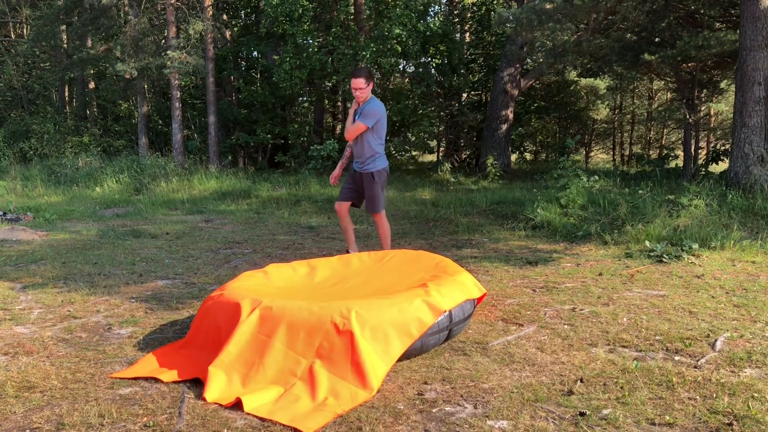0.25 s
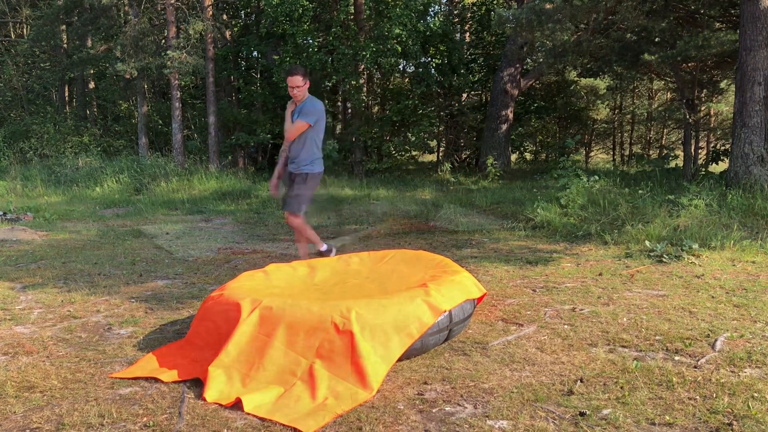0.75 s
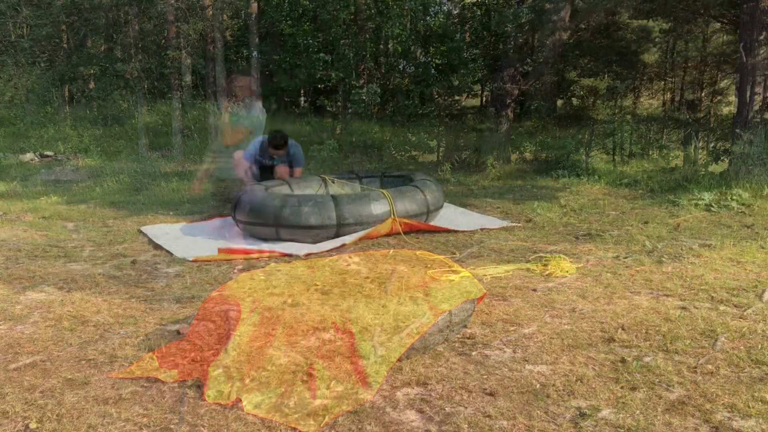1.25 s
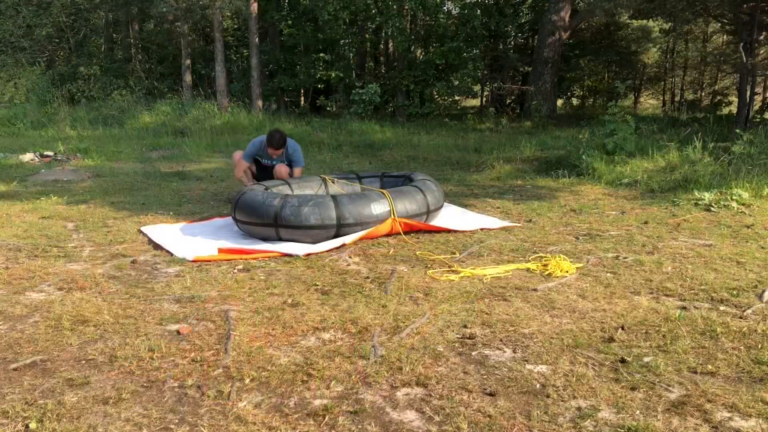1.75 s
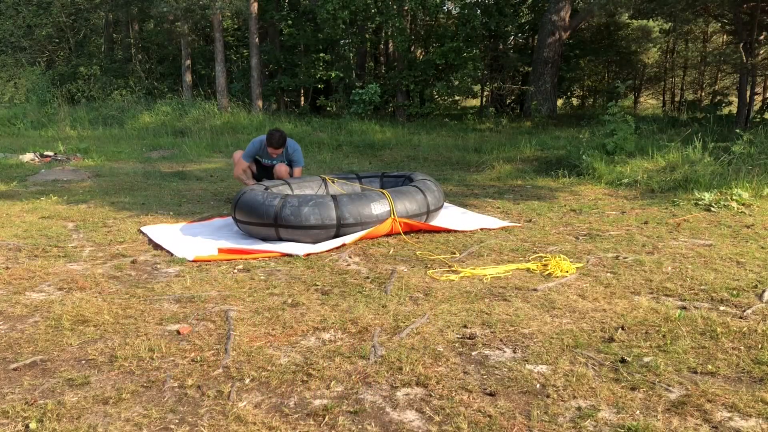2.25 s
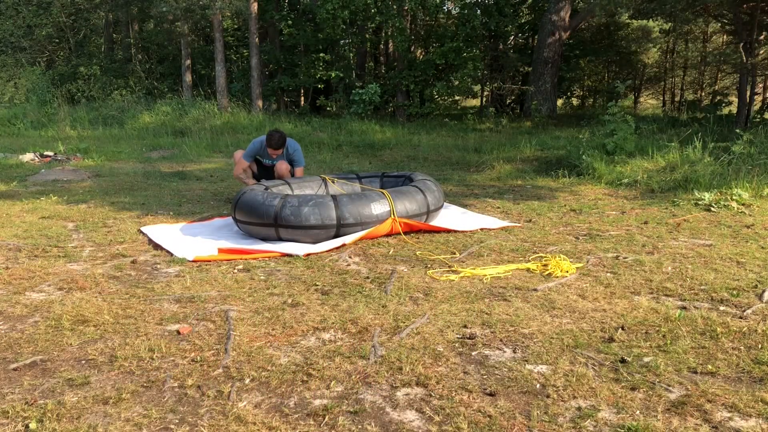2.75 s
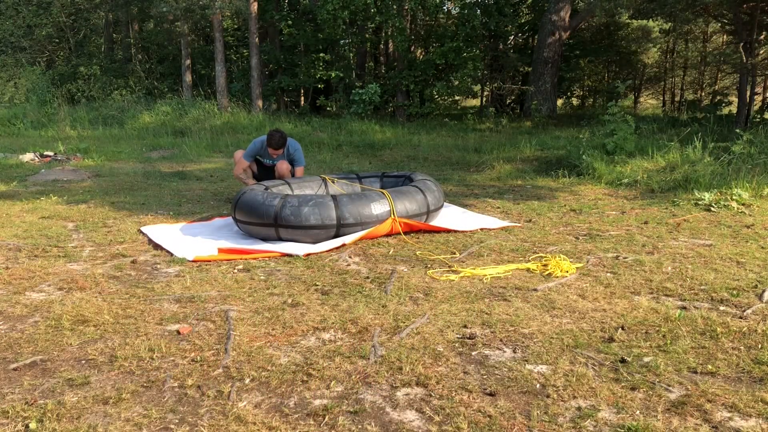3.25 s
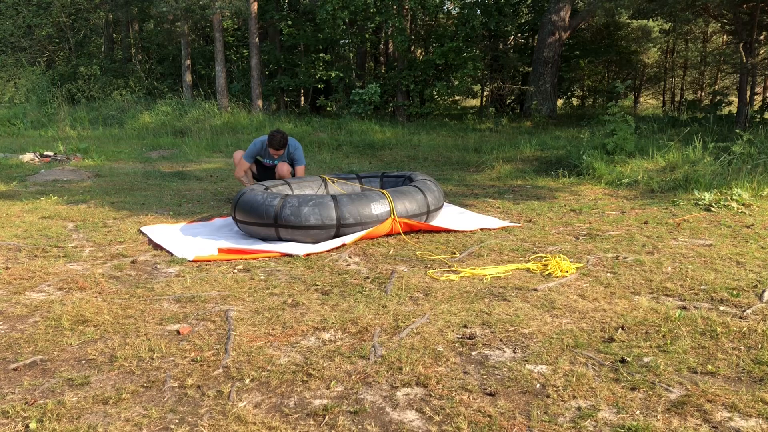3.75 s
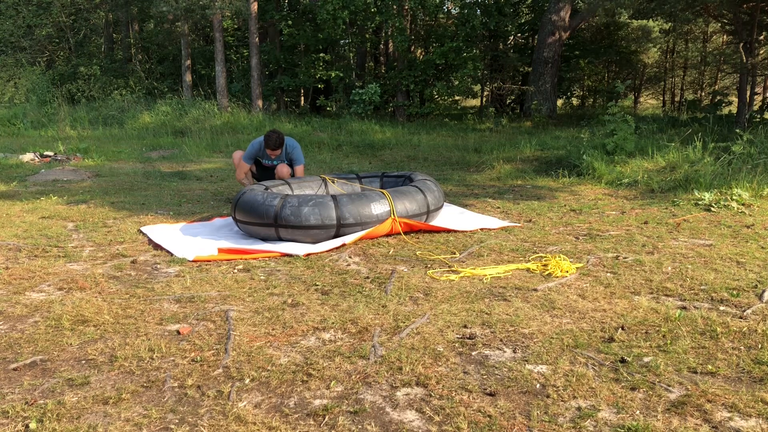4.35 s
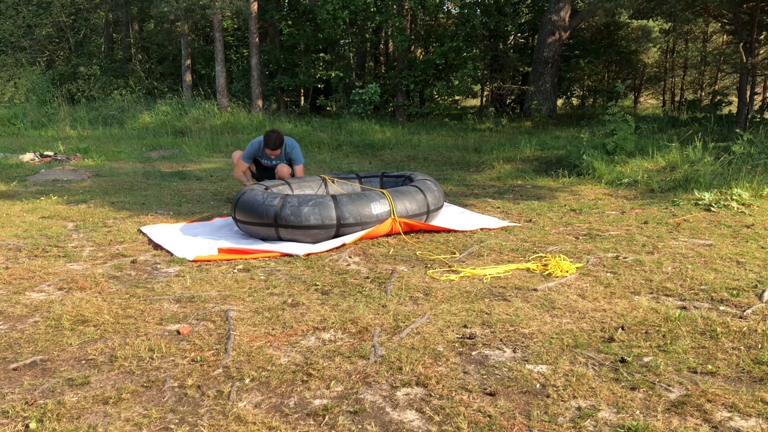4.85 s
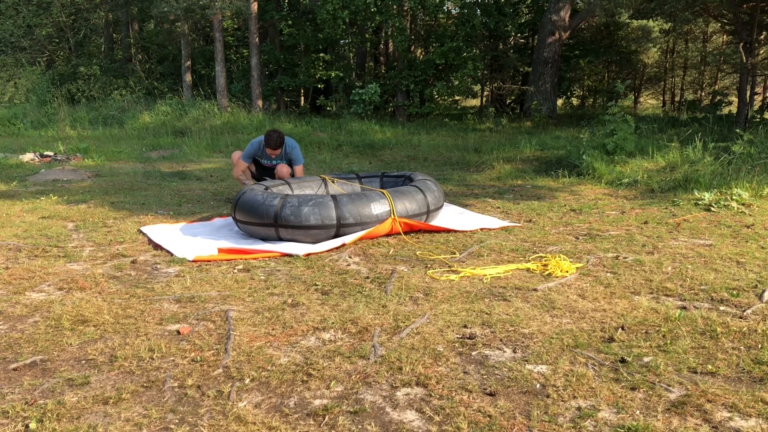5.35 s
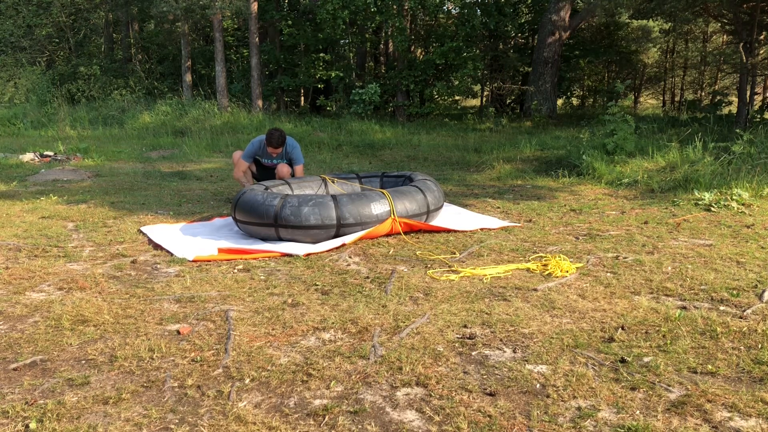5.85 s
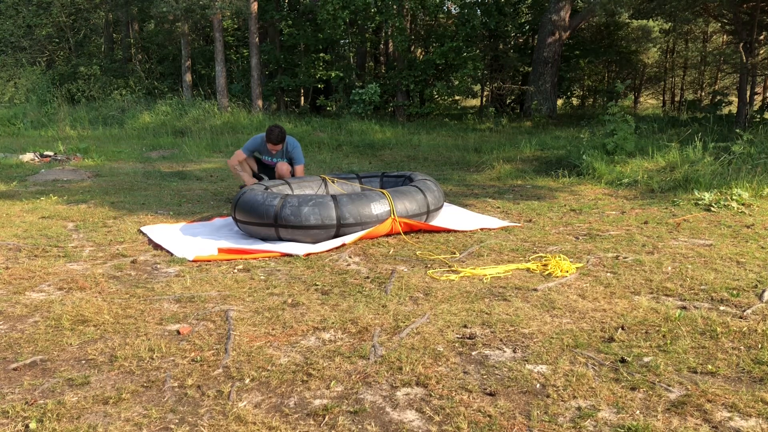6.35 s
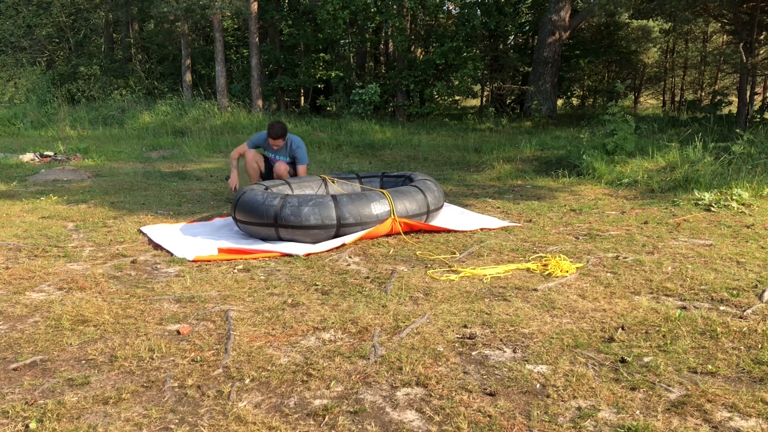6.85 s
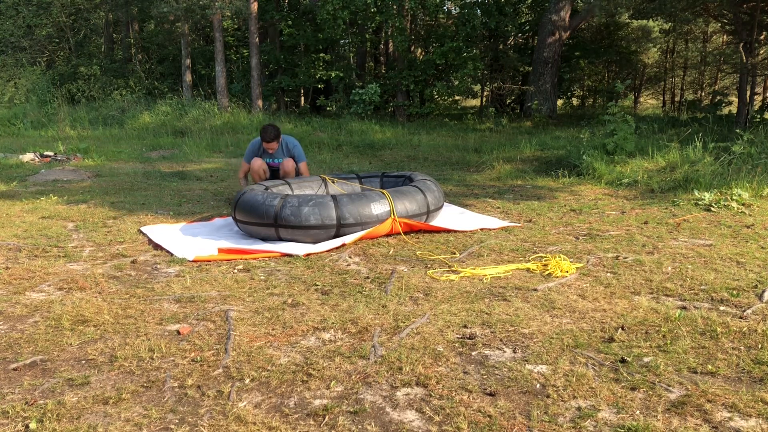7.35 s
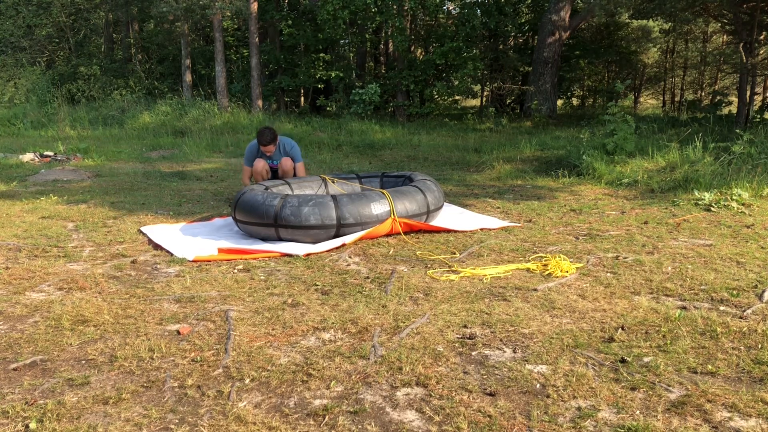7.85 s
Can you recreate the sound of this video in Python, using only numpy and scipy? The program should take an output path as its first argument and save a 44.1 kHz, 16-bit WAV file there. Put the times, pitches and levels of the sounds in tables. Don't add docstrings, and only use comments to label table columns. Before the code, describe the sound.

Steady metallic hammering on a metal punch in a forest clearing, five knocks, a pause, then nine more, with faint far road rumble.

```python
import sys
import numpy as np
from scipy import signal
from scipy.fft import rfft, irfft
from scipy.io import wavfile
from scipy.ndimage import uniform_filter1d

SR = 44100
rng = np.random.default_rng(int(sys.argv[2]) if len(sys.argv) > 2 else 0)


def dump(signal):
    limited = np.clip(np.atleast_2d(signal).T, -1, 1)
    pcm = np.round(limited * 32767).astype(np.int16)
    wavfile.write(sys.argv[1], SR, pcm)


def gain_from_decibels(decibels):
    exponent = np.asarray(decibels, float) / 20
    return 10 ** exponent


N = 357210

LENGTH = 16384
PULSE_S = np.arange(1024) / SR
STOP_S = .003
CHANGE_S, CHANGE_LENGTH_S = 1.06, 0.56
SCATTER_DB, DETUNE = 1.5, .004

# (peak in a full blow [dB], then per dB of force, seating, slant, turn [dB/dB])
CRACK_LAW = (-25.5, 0.67, 0.12, 0.02, -0.13)


def unit(x):
    return x / np.sqrt(np.mean(x ** 2))


def curve(rows, off=None):
    s, *columns = np.transpose(rows)
    return [np.interp(np.arange(N) / SR, s, c, left=off, right=off) for c in columns]


def changed(pair):
    return np.interp(np.arange(N) / SR, [CHANGE_S, CHANGE_S + CHANGE_LENGTH_S], pair)


def band(x, lo_hz, hi_hz, order=2):
    return signal.sosfilt(signal.butter(order, [lo_hz, min(hi_hz, .45 * SR)], "band", fs=SR, output="sos"), x)


def below(x, top_hz):
    return signal.sosfilt(signal.ellip(8, .2, 60, top_hz, fs=SR, output="sos"), x)


def walk(rate_hz):
    k = int(SR / rate_hz)
    held = np.repeat(rng.standard_normal(N // k + 1), k)
    return 1.31 * uniform_filter1d(uniform_filter1d(held, k), k)[:N]


def gate(start_s, end_s, fade):
    t = np.arange(N) / SR
    return uniform_filter1d(1. * (t >= start_s) * (t <= end_s), size=fade)


def coloured(spectrum, flicker_db, rate_hz):
    hz = np.fft.rfftfreq(N, 1 / SR) + 1
    points = np.transpose(spectrum)
    level_db = np.interp(np.log(hz), np.log(points[0]), points[1], -120, -120)
    shaped = rfft(rng.standard_normal(N)) * gain_from_decibels(level_db)
    place = 2 * np.log2(hz)
    total = 0
    for k in range(int(2 * np.log2(points[0, 0])), int(2 * np.log2(points[0, -1])) + 2):
        part = irfft(shaped * np.clip(1 - abs(place - k), 0, 1), N)
        total = total + gain_from_decibels(flicker_db * walk(rate_hz)) * part
    return unit(total)


def hiss():
    # (frequency [Hz], density [dB/Hz])
    hiss_spectrum = [(2650, -1.5), (4500, -4.5), (6160, -8.5), (6700, -8), (8880, -6), (10600, -10.5),
                     (15100, -1.5), (15700, 1)]
    dip_db = -3 * np.exp(-((np.arange(N) / SR - 1.13) / 0.33) ** 2)
    return gain_from_decibels(changed((-63, -63.5)) + dip_db - 1.0) * coloured(hiss_spectrum, 0.54, 12)


def road():
    # (time [s], level [dB])
    traffic = [(0.0, -52.5), (0.86, -53.5), (1.8, -49.5), (2.48, -51), (3.7, -47), (4.04, -47.5),
               (6.36, -51.5), (8.1, -49.5)]
    # (frequency [Hz], density [dB/Hz])
    rumble_spectrum = [(12, -43), (20, -53), (47, -3.5), (70, -1.5), (122, -4), (151, -7), (264, -10.5),
                       (312, -18.5), (450, -25), (580, -36), (990, -120)]
    # (frequency [Hz], density [dB/Hz])
    roar_spectrum = [(190, -23), (330, -9), (598, -8.5), (882, -2), (984, -1), (1500, -7.5), (1740, -9),
                     (2690, -20), (3190, -23), (4540, -31.5), (6000, -37), (7800, -67.5), (13200, -120)]
    rumble_db = curve(traffic)[0]
    roar_db = changed((-55, -50)) + 0.05 * (rumble_db - rumble_db.mean())
    rumble = gain_from_decibels(rumble_db) * coloured(rumble_spectrum, SCATTER_DB, 5.9)
    return rumble + gain_from_decibels(roar_db + 1.26) * coloured(roar_spectrum, 1.55, 7)


def engines():
    # (start [s], end [s], first pitch [Hz], last pitch [Hz], level [dB])
    passes = [(0.5, 0.63, 82, 64, -51), (2, 3.17, 75, 66, -50.5), (2.5, 3.6, 117, 120, -56),
              (3.5, 5.02, 64, 60, -54), (5, 6.1, 59, 92, -55.5), (6, 7.7, 64, 75, -52.5),
              (7.5, 8.5, 91, 89, -57), (6, 8.1, 72, 64, -60), (6, 9, 274, 270, -64.5),
              (3, 3.9, 268, 300, -66.5)]
    out, t = 0, np.arange(N) / SR
    for start_s, end_s, first_hz, last_hz, db in passes:
        hz = np.interp(t, [start_s, end_s], [first_hz, last_hz]) * (1 + 0.01217 * walk(4.5))
        tone = np.sqrt(2) * np.sin(2 * np.pi * np.cumsum(hz) / SR)
        out = out + gate(start_s, end_s, 8000) * gain_from_decibels(db + 2.0 * walk(3.9)) * tone
    return out


def wings(db, lo_hz, hi_hz, rate_hz, throb_db):
    return gain_from_decibels(db) * unit(band(rng.standard_normal(N) * gain_from_decibels(throb_db * walk(rate_hz)), lo_hz, hi_hz))


def far_insects():
    # (start [s], end [s], level [dB])
    groups = [(0, 2.25, -76), (3.4, 6.6, -79), (4.2, 5.5, -73.5), (6.6, 9.7, -72)]
    power = sum(gain_from_decibels(db) ** 2 * gate(start_s, end_s, 9000) for start_s, end_s, db in groups)
    return wings(10 * np.log10(np.abs(power) + gain_from_decibels(-85) ** 2), 7260, 8000, 55, 1)


def near_insect():
    # (time [s], level [dB])
    chirp = [(0.0, -61.5), (0.2, -63), (0.254, -78)]
    db = curve(chirp, off=-120)[0]
    stroke_hz, depth = 53.5, 0.31
    throb = 1 + depth * np.cos(2 * np.pi * stroke_hz * (np.arange(N) / SR - .01))
    return throb * (wings(db, 7400, 8500, 113, 1.6) + wings(db - 3, 7900, 10000, 110, 3.0))


def trunks(x):
    # (frequency [Hz], t60 [s], level [dB])
    scatter = [(148, 0.24, 14), (485, 0.16, 1.5), (1150, 0.97, -14.5), (2530, 0.068, 6), (3800, 0.41, 1),
               (6000, 0.35, 8.5), (14000, 0.24, 0)]
    t = np.arange(LENGTH) / SR
    hz, t60_s, db = np.transpose(scatter)
    tail = 0
    for centre_hz in 125 * 2 ** np.arange(0, 7.1, .5):
        place = np.log(centre_hz)
        fall_db = np.interp(place, np.log(hz), db) - 60 * t / np.interp(place, np.log(hz), t60_s)
        noise = rng.standard_normal(LENGTH)
        tail = tail + gain_from_decibels(fall_db) * band(noise, centre_hz / 2 ** .25, centre_hz * 2 ** .25)
    tail = tail * (1 - np.exp(-(t / .007) ** 2))
    spectrum = rfft(tail)
    power = abs(spectrum) ** 2
    even = np.sqrt(uniform_filter1d(power, size=300) / uniform_filter1d(power, size=24))
    tail = irfft(spectrum * even, LENGTH)
    return signal.fftconvolve(x, tail / np.sqrt(np.sum(tail ** 2)))[:N]


def gain(law, how):
    return gain_from_decibels(law[0] + np.dot(law[1:], how))


def ring(push, modes, scatter_db, detune):
    hz, db, t60_s = np.transpose(modes)[:, :, None]
    luck = rng.standard_normal((2, len(modes), 1))
    t = np.arange(LENGTH) / SR
    swell = 1 - np.exp(-t / .0007)
    body = swell * gain_from_decibels(-60 * t / t60_s) * np.sin(2 * np.pi * hz * (1 + detune * luck[1]) * t)
    each = signal.fftconvolve(push[None], body, axes=1)[:, :LENGTH]
    level = gain_from_decibels(db + scatter_db * luck[0]) / abs(each).max(axis=1, keepdims=True)
    y = np.sum(each * level, axis=0)
    return y / abs(y).max()


def low_thump(how):
    # (frequency [Hz], level [dB], t60 [s])
    thump_modes = [(255.3, 5.5, 0.034), (297, -26, 0.037), (209, -16, 0.013), (179, -7, 0.038), (148, -8, 0.065)]
    # (peak in a full blow [dB], then per dB of force, seating, slant, turn [dB/dB])
    thump_law = (-24, 1.1, 0.1, 0.01, -0.05)
    thump = -np.exp(-((PULSE_S - .0084) / 0.00091) ** 2)
    thump += 0.041 * np.exp(-((PULSE_S - .002) / 0.0027) ** 2)
    return gain(thump_law, how) * ring(thump, thump_modes, 0.83, 0.016)


def block(push, how):
    # (frequency [Hz], level [dB], t60 [s])
    block_modes = [
        [(442, -9.5, 0.012), (645, -9, 0.0094), (784, -4, .014), (913, 3, 0.017)],
        [(1130, 1.5, 0.015), (1270, 1.5, 0.013), (1368, 1, .02), (1653, -6, 0.02)],
    ]
    # (peak in a full blow [dB], then per dB of force, seating, slant, turn [dB/dB])
    block_laws = [(-21.5, 0.7, 0.48, 0.19, 0.01), (-14, 0.95, 0.01, 0.01, 0.01)]
    knock = 0.14 * np.exp(-((PULSE_S - .0003) / .0001) ** 2)
    knock += np.exp(-((PULSE_S - .0019) / .00008) ** 2)
    knock += 0.26 * np.exp(-((PULSE_S - .0122) / 0.000068) ** 2)
    mixed = knock + 0.064 * push
    return sum(gain(law, how) * ring(mixed, modes, 1.6, 0.018) for law, modes in zip(block_laws, block_modes))


def punch(push, how):
    # (frequency [Hz], level [dB], t60 [s])
    face = [(7200, -2, .015), (8000, -4, .012), (9930, -9, .03), (13060, -10, .025), (14400, -6, .015)]
    # (frequency [Hz], level [dB], t60 [s])
    punch_modes = [
        [(2794, -1.5, 0.023), (2697, -4.5, 0.016), (2922, -7, 0.029)],
        [(2300, -2, 0.014), (2490, -0.5, 0.046), (2670, 0, 0.033)],
        [(2000, -1.2, 0.029), (2099, -0.72, 0.033), (2247, -3.1, 0.025)],
        [(3035, -1.5, 0.023), (3150, 0, 0.0094), (3330, -1.4, 0.0095)],
    ]
    # (frequency [Hz], level [dB], t60 [s])
    steel_modes = [
        [(3540, -2, 0.0089), (3980, -2, 0.031), (4280, 3, 0.019), (4600, -10, 0.023)],
        [(5160, -2.5, .018), (5630, -6, 0.028), (6310, -6, 0.011), (6200, -2, 0.013)],
    ]
    # (peak in a full blow [dB], then per dB of force, seating, slant, turn [dB/dB])
    metal_laws = [(-17.5, 1.05, 0.87, 0.01, 0.01), (-27, 0.82, 0.0092, 1.44, 0.16),
                  (-20.5, 1.18, 0.36, 0.082, 0.31), (-27, 1, 1.1, 0.46, -0.28),
                  (-31, 1.01, 0.3, 0.3, -0.13), (-38.5, 1.4, .1, .3, 0.076)]
    out = gain(CRACK_LAW, how) * .12 * ring(push, face, 3.0, .003)
    for k, (law, modes) in enumerate(zip(metal_laws, punch_modes + steel_modes)):
        out += (-1) ** k * gain(law, how) * ring(push, modes, SCATTER_DB, DETUNE)
    return out


def hammer_head(push, how):
    # (frequency [Hz], level [dB], t60 [s])
    head_modes = [
        [(3800, 0, .04)],
        [(3810, 0, .7), (3790, -4, .25)],
        [(5165, 0, .05), (5178, -21, .2)],
        [(5910, 0, .07), (5902, -12, .3)],
        [(8720, 0, .1)],
        [(14815, 0, .035), (14800, -18, .15)],
    ]
    # (peak in a full blow [dB], then per dB of force, seating, slant, turn [dB/dB])
    head_laws = [(-26, 0.87, 0.27, 0.73, 0.071), (-56, 0.94, 0.3, 1.3, 0.83),
                 (-37.5, 1.01, -.2, 0.11, 0.85), (-54.5, 1.7, -1.6, -0.068, -1.2),
                 (-65, .8, 0.13, 0.01, 0.01), (-38, .8, 0.01, 0.01, -.6)]
    turn = np.interp(np.arange(LENGTH), np.arange(0, LENGTH, 800), rng.standard_normal(21))
    tone = sum(gain(law, how) * ring(push, modes, SCATTER_DB, 0.00034)
               for law, modes in zip(head_laws, head_modes))
    return gain_from_decibels(2.5 * turn) * tone


def brass_push(grain):
    crunch = (0.67 + PULSE_S / STOP_S) ** 1.23
    shape = np.where(PULSE_S < STOP_S, crunch, np.exp(-(PULSE_S - STOP_S) / .0018))
    shape += 0.31 * np.exp(-((PULSE_S - .0115) / 0.0014) ** 2)
    push = shape * grain
    push[int(STOP_S * SR)] += 8.0
    return push


def bright(x):
    return signal.lfilter([1, -0.32], 1, band(np.pad(x, (0, LENGTH - len(x))), 4860, 15100))


def brass_crack(grain, how):
    fade = np.exp(-np.maximum(PULSE_S - STOP_S, 0) / 0.0039)
    crack = bright(grain * (fade + .5 * np.exp(-PULSE_S / 0.00065)))
    crack = gain(CRACK_LAW, how) * crack / abs(crack).max()
    click = 1. * (np.arange(len(PULSE_S)) == int(STOP_S * SR))
    aside = gain_from_decibels(0.5) * unit(bright(click)) * np.std(crack)
    return crack, aside


def hammer():
    # (time [s], force re full blow [dB], punch seating [dB], punch slant [dB], head turn [dB])
    blows = [(0.7827, -21, 0, 0.5, -1), (1.0805, -9, 0.5, -8, -5), (1.3642, -2.5, -2, -3, -8),
             (1.6669, 1.5, -3.5, -5, -5), (1.9693, 2, -4, -4, 4.5), (3.6026, -14, 2, -3, 8),
             (3.91, -6.5, -3, 4, 2), (4.2072, -1, 1, -1.5, 0.5), (4.4978, -1.5, 4.5, -6, 3.5),
             (4.797, 0.5, -0.5, -2.5, 2), (5.0925, 0, -0.5, 2, 1), (5.3967, -0.5, 2.5, -0.5, 2.5),
             (5.6895, 0, 4, 7.5, -7), (5.9755, 0.5, 5, 6.5, -3.5)]
    near, far = np.zeros(N + LENGTH), np.zeros(N + LENGTH)
    habit = rng.standard_normal(len(PULSE_S))
    for s, *how in blows:
        grain = habit + 0.35 * rng.standard_normal(len(PULSE_S))
        push = brass_push(grain)
        crack, aside = brass_crack(grain, how)
        body = punch(push, how) + block(push, how) + low_thump(how)
        head = hammer_head(push, how)
        start = int(s * SR)
        near[start:start + LENGTH] += body + crack + head
        share_db = -10.5 - 0.16 * how[0]
        shade_db = -7
        far[start:start + LENGTH] += gain_from_decibels(share_db) * (body + aside + gain_from_decibels(shade_db) * head)
    return near[:N], trunks(far[:N])


def scene():
    floor = road() + engines() + far_insects() + near_insect() + hiss()
    near, far = (band(x, 125, 17000, order=6) for x in hammer())
    return (below(near, 16500) + below(far + floor, 15800))[None]


def low_pass(x):
    return signal.sosfilt(signal.butter(12, 16990, fs=SR, output="sos"), x)


def record(dry):
    return low_pass(dry)


dry = scene()
out = record(dry)
dump(out)
```